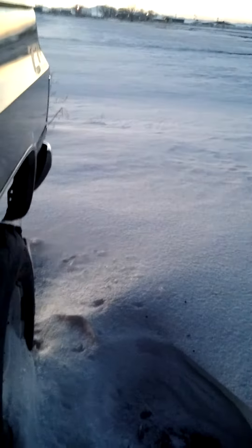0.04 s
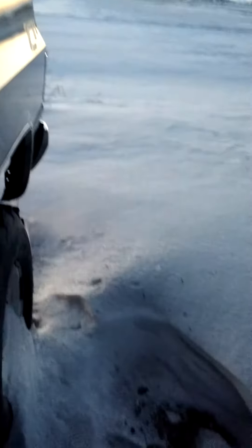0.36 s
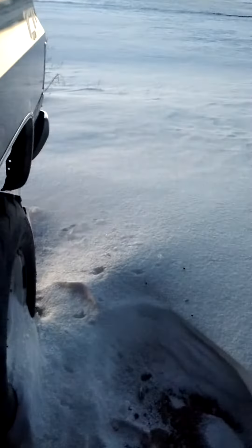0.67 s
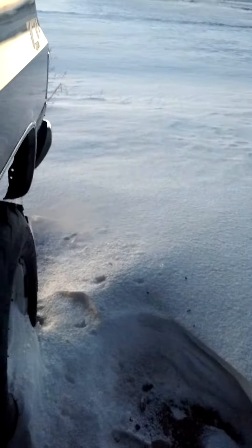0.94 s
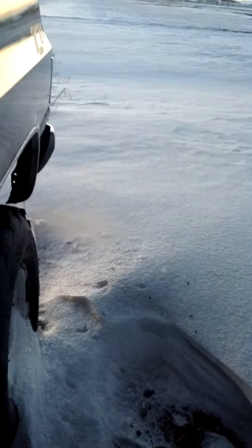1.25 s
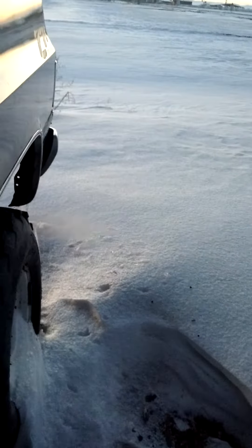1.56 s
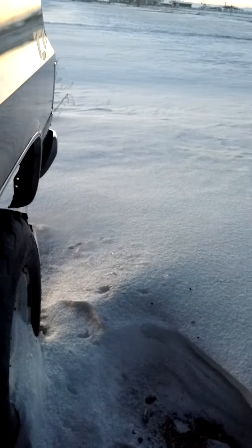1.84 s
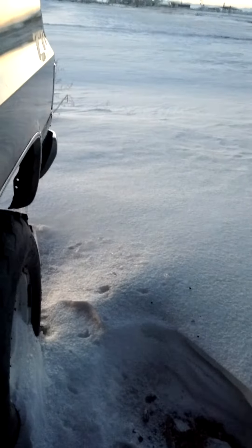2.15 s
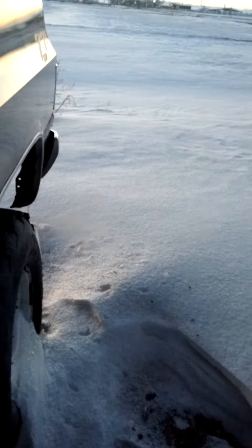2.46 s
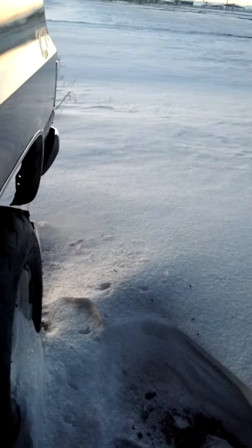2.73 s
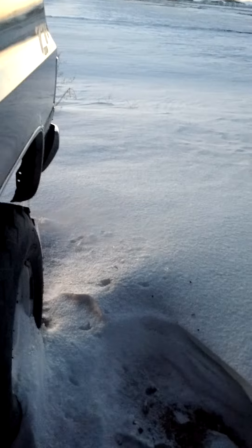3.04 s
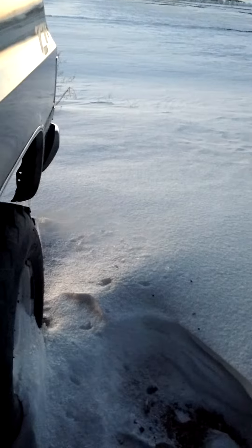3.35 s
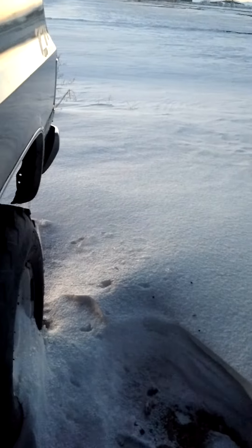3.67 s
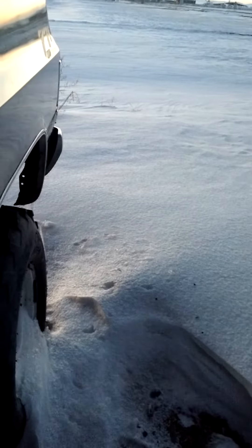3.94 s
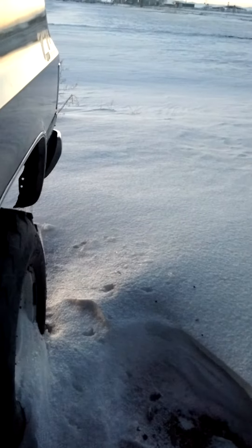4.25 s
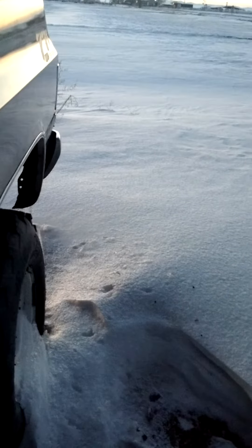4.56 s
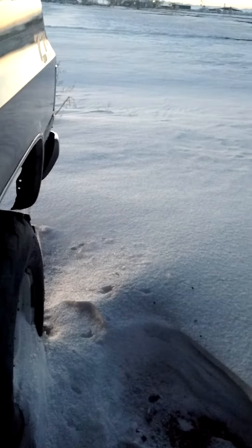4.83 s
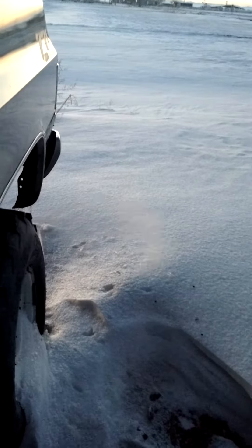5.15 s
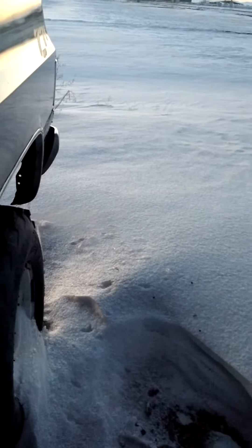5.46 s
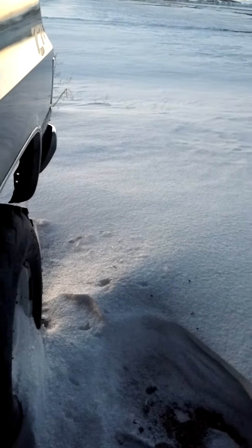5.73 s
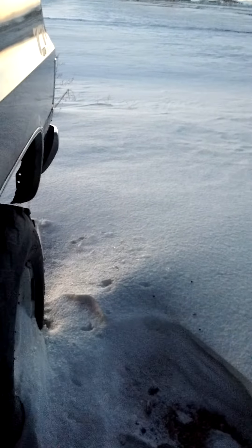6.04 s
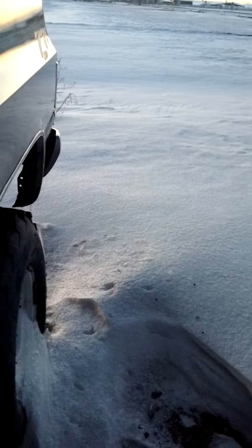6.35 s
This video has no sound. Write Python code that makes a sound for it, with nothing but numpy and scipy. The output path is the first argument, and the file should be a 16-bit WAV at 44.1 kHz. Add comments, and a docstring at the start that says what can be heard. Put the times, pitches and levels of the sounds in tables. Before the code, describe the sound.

A cold truck engine idles close to the tailpipe, loping and sputtering with wet puffs, then sags to a slower, stumbling beat.

```python
"""A cold truck engine lopes at fast idle, then sags to a slower, stumbling idle.
Uneven firings thump through muffler and tailpipe; late-burning charges burble, afterfires knock.
The gas stream rings the pipe's upper modes and spits condensation in wet puffs of hiss.
Heard at a phone's two microphone ports beside the pipe, in an open snowy field with no echo."""
import sys
import numpy as np
from scipy import signal
from scipy.fft import rfft, irfft, next_fast_len
from scipy.io import wavfile

SR = 44100
rng = np.random.default_rng(int(sys.argv[2]) if len(sys.argv) > 2 else 0)


def unload_audio(sound):
    """Save the sound as a 16-bit wav file, at the path given as the first command line argument."""
    columns = np.transpose(np.atleast_2d(sound))
    # keep every value between -1 and 1, then stretch to whole-number steps
    steps = np.round(np.clip(columns, -1, 1) * 32767)
    wavfile.write(sys.argv[1], SR, steps.astype(np.int16))


N = 291060
TIME_S = np.arange(N) / SR
FFT_SIZE = next_fast_len(N + SR // 2, True)
FREQ_HZ = np.maximum(np.arange(FFT_SIZE // 2 + 1) * SR / FFT_SIZE, 1)
FAST_FIRING_HZ, SLOW_FIRING_HZ = 53.37, 42.84
LOPE_START_S, SAG_S = 0.2795, 3.74

# Table levels are relative; each layer adds its own gain.
# one round of the lope, twice through eight cylinders: level_db
LOPE = [-19, -21.5, -16.5, -24.5, -18.5, -24, -20, -20, -19, -25, -19, -17, -22, -27.5, -27, -25.5]
# firing strength as the slow idle falters and recovers: time_s, level_db
STUMBLE = [(3.74, -26), (3.83, -38), (3.88, -34), (3.93, -33), (4.16, -36), (4.72, -24.5), (4.8, -41),
           (4.84, -26), (4.96, -42), (5.01, -26.5), (5.55, -34.5), (5.81, -36), (5.84, -30), (6.55, -32.5)]
# firings that anchor the beat, most burning extra hard: time_s, level_db
THUMPS = [(0.157, -12), (0.439, -17), (0.472, -13.5), (0.895, -16), (1.029, -12.5), (1.084, -15.5),
          (1.217, -18.5), (1.327, -14.5), (1.513, -15.5), (1.623, -17), (1.816, -14.5), (1.929, -13),
          (1.966, -15), (2.394, -15.5), (2.418, -17), (2.527, -15.5), (2.564, -16.5), (2.847, -13),
          (2.994, -17.5), (3.186, -14.5), (3.559, -16), (3.583, -15), (3.809, -15), (3.947, -13),
          (4.501, -13.5), (4.645, -15), (4.699, -13), (4.72, -13), (5.108, -18.5), (5.185, -13.5),
          (5.209, -33), (5.342, -20), (5.394, -18.5), (5.447, -12), (5.465, -17), (5.557, -14), (5.6, -17),
          (5.856, -15), (5.906, -20.5), (5.954, -20), (5.971, -14), (5.998, -19), (6.237, -17.5),
          (6.285, -22), (6.339, -15.5), (6.378, -16), (6.401, -17.5), (6.56, -16)]
# tailpipe ring and muffler boom over time: time_s, ring_db, boom_db
EXHAUST_LEVELS = [(0, 3, 6), (3.5, 4.5, 6), (4.0, 0, 5), (4.6, -6, 4.5), (5.3, -1, 7.5), (6.6, -2, 10)]
# flow through the pipe: time_s, stream_db, steady_hiss_db
FLOW = [(0, -39, -50), (.66, -40, -51.5), (2.2, -41.5, -53.5), (2.8, -39.5, -47.5), (4.03, -39, -54),
        (4.23, -53.5, -57.5), (4.52, -38.5, -48.5), (4.87, -43, -58.5), (5.15, -38, -49), (5.5, -40, -47.5),
        (5.68, -40.5, -57), (6.6, -36.5, -51)]
# late-burning charges: time_s, level_db, pitch_hz
BURBLES = [(0.197, -25, 683), (0.442, -26, 404), (0.487, -25.5, 700), (1.026, -29, 513), (1.08, -26.5, 687),
           (1.309, -28, 403), (1.604, -29, 405), (1.686, -34, 655.6), (1.997, -24, 515), (2.526, -33, 415),
           (2.581, -27.5, 660), (2.887, -28, 660), (3.201, -26, 638), (3.487, -23, 638),
           (3.685, -23.5, 490), (4.389, -35, 507), (4.489, -23, 434), (4.556, -23, 754), (4.585, -28, 540),
           (4.812, -29.5, 658), (5.048, -27, 640), (5.46, -23.5, 550), (5.573, -30, 407),
           (5.836, -24.5, 670), (5.857, -23, 550)]
# afterfires in the pipe: start_s, level_db
KNOCKS = [(0.3256, -22), (0.6112, -26), (1.8172, -38), (2.525, -25), (3.594, -23), (3.952, -30.5),
          (4.6977, -38), (5.186, -28), (5.459, -30), (5.572, -32)]
# wet gas spat from the mouth: time_s, level_db
PUFFS = [(0.101, -41.5), (0.158, -43), (0.212, -41.5), (0.308, -46), (0.4, -35), (0.452, -42.5),
         (0.502, -44), (0.592, -44), (0.687, -44), (0.795, -43), (0.892, -62), (0.955, -43), (0.99, -36.5),
         (1.042, -41.5), (1.252, -44), (1.288, -40), (1.341, -42), (1.394, -45.5), (1.49, -45.5),
         (1.548, -46), (1.584, -40), (1.693, -45.5), (1.792, -46.5), (1.889, -39), (1.943, -40.5),
         (2.089, -45.5), (2.146, -42.5), (2.182, -39.5), (2.293, -42.5), (2.395, -46), (2.488, -38),
         (2.543, -40), (2.688, -45), (2.751, -43), (2.79, -38.5), (2.849, -42), (2.896, -43), (2.995, -44),
         (3.09, -37), (3.199, -40), (3.294, -46), (3.394, -36.5), (3.503, -39), (3.559, -36.5),
         (3.708, -38.5), (3.923, -42.5), (4.088, -42), (4.387, -32.5), (4.468, -42), (4.496, -35),
         (4.532, -42), (4.557, -35.5), (4.583, -28.5), (4.643, -31), (4.672, -36.5), (4.698, -47),
         (4.721, -40.5), (4.809, -38.5), (4.892, -39), (5.045, -34.5), (5.106, -36.5), (5.135, -48),
         (5.184, -36.5), (5.267, -38), (5.339, -38.5), (5.395, -40), (5.463, -39), (5.51, -39.5),
         (5.724, -44), (5.854, -42), (5.905, -37), (5.974, -42.5), (6.047, -37.5), (6.12, -46),
         (6.233, -36), (6.285, -39.5), (6.354, -40), (6.433, -34), (6.509, -40.5), (6.559, -43.5)]

# one firing leaving the tailpipe: freq_hz, gain_db
TAILPIPE_SPECTRUM = [(6, -35.5), (22, -14), (40, -24), (70, 4.5), (92, -1), (108, 5), (133, 5), (152, -4.5),
                     (195, -15.5), (240, -22.5), (300, -35), (500, -25), (2500, -103)]
# steepened pressure wave: freq_hz, gain_db
POP_SPECTRUM = [(40, -7), (130, 4), (210, -22), (300, 3.5), (650, 1.5), (1100, 1), (1700, -16.5),
                (4000, -53)]
# eddies shed at the mouth: freq_hz, gain_db
EDDY_SPECTRUM = [(8, 0), (30, 13), (50, 7.5), (190, 5.5), (400, -36)]
# turbulence in the pipe: freq_hz, gain_db
TURBULENCE_SPECTRUM = [(100, -18), (230, 8.5), (300, -0.5), (500, 0.5), (610, -6.5), (680, -3), (880, -11),
                       (1120, -5.5), (1260, -10), (1450, -9), (2000, -10), (2700, -42.5), (5000, -81)]
# rasp of a burble: freq_hz, gain_db
BURBLE_SPECTRUM = [(30, -16), (200, -26.5), (345, 0.5), (410, 2.5), (490, -0.5), (590, -1), (680, -2.5),
                   (880, -8), (1120, -11), (1600, -20), (4000, -30)]
# hiss at the mouth: freq_hz, gain_db
HISS_SPECTRUM = [(600, 16), (2000, 2.5), (2700, 1.5), (3300, 10.5), (4300, 8), (5350, 2.5), (6100, 4.5),
                 (7100, -1.5), (8200, -2), (9100, -1), (10400, 2.5), (13000, -9), (15500, -25)]

# low pipe modes: pitch_hz, width_hz, gain_db
THROAT_MODES = [(366, 14, -9), (409, 24, 9.5), (520, 15, 9.5), (662.3, 32, 8), (786, 27, -7)]
# narrow modes at the onset of the pipe's first cross-wave: pitch_hz, width_hz, gain_db
CROSS_MODES = [(1630, 22, 6), (1850.4, 40, 5), (1871, 19, 3), (1940, 65, 2.5), (1966, 28, 2.5),
               (2046, 20, 11), (2087, 26, 14.5), (2178, 51, 8.5), (2268, 23, 3.5), (2343, 17, -23),
               (2350, 48, 6)]
# higher cross-modes that colour the hiss: pitch_hz, width_hz, gain_db
MOUTH_MODES = [(3970, 36, -5), (6150, 52, 8), (7550, 61, -9), (9900, 240, 7)]
# water squirting off the rim: centre_hz, width_hz, gain_db
SQUIRT_BANDS = [(4370, 1100, -7.5), (6060, 1800, 5)]

# left port, shaded by the phone, against the right: freq_hz, gain_db
LEFT_GAIN = [(20, 0), (45, -14.5), (70, -16.5), (100, -4), (135, -5.5), (165, -10.5), (340, -2),
             (500, -8.5), (800, 1), (1150, 0), (2150, -5), (3200, 1.5), (6000, -4), (12000, -9.5)]
# left port's phase against the right: freq_hz, lead_rad
LEFT_LEAD = [(45, 0), (110, 1.2551), (1000, 2.5), (2600, 1.28), (4000, 1)]


def undb(db):
    """Decibels to gain."""
    return 10 ** (np.asarray(db) / 20)


def unit_rms(x):
    """Scale to rms 1."""
    return x / np.sqrt(np.mean(x ** 2))


def curves(table, at_s=TIME_S):
    """Table columns, interpolated in time."""
    time_s, *columns = np.transpose(table)
    return [np.interp(at_s, time_s, column) for column in columns]


def over_freq(points):
    """Rows (freq_hz, value), interpolated in log frequency."""
    freq_hz, value = np.transpose(points)
    return np.interp(np.log(FREQ_HZ), np.log(freq_hz), value)


def colour(spectrum):
    """Minimum-phase response from rows (freq_hz, gain_db)."""
    cepstrum = irfft(np.log(undb(over_freq(spectrum))), FFT_SIZE)
    cepstrum[1:FFT_SIZE // 2] *= 2
    cepstrum[FFT_SIZE // 2 + 1:] = 0
    return np.exp(rfft(cepstrum))


def resonance(hz, width_hz):
    """Response of one mode, gain 1 at centre."""
    return 1 / (1 + 1j * (FREQ_HZ ** 2 - hz ** 2) / (FREQ_HZ * width_hz))


def mode_bank(modes):
    """Summed response of rows (pitch_hz, width_hz, gain_db)."""
    return sum(undb(db) * resonance(hz, width_hz) for hz, width_hz, db in modes)


def delay(lag_s):
    """Response of a pure delay."""
    return np.exp(-2j * np.pi * FREQ_HZ * lag_s)


def through(x, response):
    """Filter by a frequency response."""
    return irfft(rfft(x, FFT_SIZE) * response, FFT_SIZE)[..., :N]


def excite(pulses, response):
    """Filter pulses; the impulse response is scaled to peak 1."""
    return through(pulses, response / np.abs(irfft(response, FFT_SIZE)).max())


def noise(response, coherence):
    """Coloured noise at both ports, partly shared, rms 1."""
    shared = np.sqrt(coherence) * rng.standard_normal(N)
    separate = np.sqrt(1 - coherence) * rng.standard_normal((2, N))
    return unit_rms(through(shared + separate, response))


def flutter(rate_hz):
    """Random wander within +-2."""
    knots = np.clip(rng.standard_normal(N // 20), -2, 2)
    return np.interp(TIME_S * rate_hz, np.arange(len(knots)), knots)


def impulses(times_s, gains):
    """Impulse train."""
    return np.bincount(np.clip(times_s * SR, 0, N - 1).astype(int), gains, N)


def swells(events, rise_s, fall_s, order=1):
    """Envelope peaking at each row (time_s, level_db); order 1 pointed, order 2 rounded."""
    time_s, level_db = np.transpose(events)
    lag_s = np.arange(-(SR // 8), SR // 8 + 1) / SR
    shape = np.exp(-2 * np.abs(lag_s / np.where(lag_s < 0, rise_s, fall_s)) ** order)
    power = signal.fftconvolve(impulses(time_s, undb(level_db) ** 2), shape, "same")
    return np.sqrt(np.abs(power))


def mic_hiss(level_db=-71):
    """Steady self-noise of the microphones."""
    return noise(resonance(7900, 9000) ** 2, coherence=0) * undb(level_db)


def engine_bay(firings, level_db=-49):
    """The engine throbs under the body and reaches each port by a different path."""
    throb = unit_rms(np.sqrt(swells(firings, rise_s=0.002, fall_s=0.008)))
    return noise(resonance(396, 260) ** 2, coherence=0) * throb * undb(level_db)


def droplets(rate_hz=55, spread_db=4):
    """Envelope of drops torn from the rim: instant onset, fast decay."""
    position, chance = rng.random((N // 100, 2))[:int(rate_hz * N / SR)].T
    level_db = spread_db * np.minimum(-np.log(chance), 2)
    return unit_rms(swells(np.c_[position * N / SR, level_db], rise_s=1 / SR, fall_s=0.004))


def rim_sizzle(steady_db, gain_db=-8.5, growth=0.62):
    """The water film on the rim sizzles in two bands as flow rises."""
    film = resonance(6550, 570) ** 2 + resonance(4450, 830) ** 2 / 2
    level_db = gain_db + steady_db + growth * (steady_db - steady_db.mean())
    return noise(film, coherence=0.29) * undb(level_db)


def wet_hiss(slow, wet_db=-32, puff_db=-2, tilt_db=2, drop_db=-8, hollow_db=-5):
    """Condensation blows out over a thin steady hiss: in puffs, and a little per slow firing."""
    _, steady_db = curves(FLOW)
    puffs = np.vstack([PUFFS, slow + [0, wet_db]])
    puffing = swells(puffs, rise_s=0.012, fall_s=0.012, order=2) * undb(puff_db)
    blow = np.hypot(puffing, undb(steady_db))
    mouth = colour(HISS_SPECTRUM) * (1 + mode_bank(MOUTH_MODES))
    hiss = noise(mouth, coherence=0.85)
    bright = through(hiss, undb(over_freq([(4500, -3), (6000, 10)])))
    tilt = undb(tilt_db * flutter(23) / 2)
    spray = (hiss - bright) / tilt + bright * tilt
    crackle = noise(mouth * resonance(5930, 9600), coherence=0.14) * droplets() * undb(drop_db)
    sizzle = rim_sizzle(steady_db)
    # puffs blow a hollow pipe note, strong ones most
    hollow = noise(resonance(1103, 96) ** 2, coherence=0.87) * undb(hollow_db)
    hollow *= (blow / blow.max()) ** 0.17
    return (spray + hollow) * blow + sizzle + crackle * np.sqrt(blow * undb(steady_db))


def squirts(gain_db=-7.5, wander_db=3):
    """Each puff tears water off the rim; two noise bands wander in level."""
    burst = swells(PUFFS, rise_s=0.0005, fall_s=0.007) * undb(gain_db)
    bands = sum(noise(resonance(hz, width_hz) ** 2, coherence=0.42) * undb(db + wander_db * flutter(30))
                for hz, width_hz, db in SQUIRT_BANDS)
    return bands * burst


def whumps(gain_db=-6):
    """Strong puffs shove out a slug of gas, which adds low body."""
    shove = swells(PUFFS, rise_s=0.004, fall_s=0.025)
    body = noise(resonance(263, 100) ** 2, coherence=1)
    return body * shove * np.sqrt(shove / shove.max()) * undb(gain_db)


def knocks(gain_db=-1.5):
    """Afterfire in the pipe: one steep, dry pressure spike each."""
    start_s, level_db = np.transpose(KNOCKS)
    rolloff = undb(over_freq([(1400, 0), (3000, -30)]))
    spike = resonance(520, 900) * resonance(1300, 1500) * rolloff
    return excite(impulses(start_s, undb(level_db + gain_db)), spike)


def burbles(rasp_db=-10, roughness_db=2, note_db=-9, note_s=0.011, sag_per_s=1.34):
    """Late-burning charges rasp in the pipe; each rings a note that sinks as the gas cools."""
    rasp = noise(colour(BURBLE_SPECTRUM), coherence=1) * undb(roughness_db * flutter(320))
    burst = swells(np.array(BURBLES)[:, :2], rise_s=0.005, fall_s=0.016)
    notes = np.zeros(N)
    for time_s, level_db, pitch_hz in BURBLES:
        near = np.abs(TIME_S - time_s) < 0.06
        lag_s = TIME_S[near] - time_s
        cycles = rng.random() + pitch_hz * lag_s * (1 - sag_per_s * lag_s / 2)
        notes[near] += undb(level_db - 5 * (lag_s / note_s) ** 2) * np.sin(2 * np.pi * cycles)
    return rasp * burst * undb(rasp_db) + notes * undb(note_db)


def gas_stream(firings, churn_db=-39, modes_db=1, pulsing=0.27, churn_follow=0.11, lope_share=0.075):
    """The stream surges with each firing, churns in the pipe and rings its cross-modes."""
    stream_db = curves(FLOW)[0] + lope_share * lope_db(TIME_S)
    pulses = unit_rms(swells(firings, rise_s=0.012, fall_s=0.012))
    surge = unit_rms(1 - pulsing + pulsing * pulses)
    churn = noise(colour(TURBULENCE_SPECTRUM), coherence=0.97)
    churn *= unit_rms(surge * undb(churn_follow * stream_db))
    drive = noise(resonance(1982, 1290) ** 2, coherence=0.93) * surge
    ringing = unit_rms(through(drive, mode_bank(CROSS_MODES)))
    return churn * undb(churn_db) + ringing * undb(stream_db + modes_db)


def eddies(firings, level_db=-33):
    """Each slug of gas sheds eddies that rumble unevenly."""
    shedding = unit_rms(swells(firings, rise_s=0.031, fall_s=0.0022))
    return noise(colour(EDDY_SPECTRUM), coherence=0.54) * shedding * undb(level_db)


def pops(firings, gain_db=-1):
    """The hardest pressure waves steepen in the pipe and exit with a pop."""
    time_s, level_db = firings.T
    steepened = impulses(time_s, undb(level_db) ** 2) * undb(gain_db)
    return -excite(steepened, colour(POP_SPECTRUM))


def throat(firings, gain_db=-17):
    """Each firing rings the pipe's low modes."""
    time_s, level_db = firings.T
    return excite(impulses(time_s, undb(level_db + gain_db)), mode_bank(THROAT_MODES))


def lope_db(at_s, lag_s=0.015, settle_s=0.43, fade_s=0.29):
    """Firing strength about its mean: the lope starts late, settles, evens out before the sag."""
    late_s = lag_s / (1 + (at_s / settle_s) ** 8)
    firing_index = (at_s - late_s - LOPE_START_S) * FAST_FIRING_HZ
    level_db = np.interp(firing_index, np.arange(len(LOPE)), LOPE, period=len(LOPE))
    return (level_db - np.mean(LOPE)) * np.clip((SAG_S - at_s) / fade_s, 0, 1)


def firing_times(start_s, end_s, rate_hz):
    """Ordinary firings, evenly spaced between thumps at about rate_hz."""
    edges_s = [start_s] + [s for s, _ in THUMPS if start_s < s < end_s] + [end_s]
    steps = np.maximum(1, np.round(np.diff(edges_s) * rate_hz)).astype(int)
    gaps = zip(edges_s, edges_s[1:], steps)
    return np.concatenate([np.linspace(from_s, to_s, count + 1)[1:-1] for from_s, to_s, count in gaps])


def slow_firings(gain_db=7.5, scatter_db=5, jitter_s=0.00197):
    """Stumbling idle, rows (time_s, level_db); a burn can be much weaker, never much stronger."""
    time_s = firing_times(SAG_S, N / SR, SLOW_FIRING_HZ)
    burn, timing = rng.standard_normal((N // 500, 2))[:len(time_s)].T
    level_db = curves(STUMBLE, time_s)[0] + gain_db + scatter_db * np.minimum(burn, 1)
    return np.c_[time_s + jitter_s * timing, level_db]


def fast_firings(scatter_db=3, jitter_s=0.00059, limp_s=0.00097, wander_s=0.0011):
    """Loping idle, rows (time_s, level_db); alternate pulses fall early and late, so the beat limps."""
    time_s = firing_times(-1 / FAST_FIRING_HZ, SAG_S, FAST_FIRING_HZ)
    burn, timing = rng.standard_normal((N // 500, 2))[:len(time_s)].T
    level_db = np.mean(LOPE) + lope_db(time_s) + scatter_db * np.minimum(burn, 1)
    limp_sign = np.cos(np.pi * np.round((time_s - LOPE_START_S) * FAST_FIRING_HZ))
    drift_s = wander_s * np.interp(time_s, TIME_S, flutter(14))
    return np.c_[time_s + drift_s + limp_s * limp_sign + jitter_s * timing, level_db]


def exhaust_beat(firings, ring_gain_db=-1, boom_gain_db=-13, lead_s=0.00487):
    """Each firing rings the tailpipe; the suction behind it booms the muffler. Both dip in the lope."""
    time_s, level_db = firings.T
    pulses = impulses(time_s, undb(level_db))
    ring = excite(pulses, colour(TAILPIPE_SPECTRUM) * delay(-lead_s))
    boom = -excite(pulses, resonance(41.4, 10.9) * resonance(46, 99))
    ring_db, boom_db = curves(EXHAUST_LEVELS)
    dip_db = 0.75 * np.minimum(lope_db(TIME_S), 0)
    return ring * undb(ring_gain_db + ring_db + dip_db) + boom * undb(boom_gain_db + boom_db + dip_db / 2)


def scene():
    """Exhaust, shaded and phase-shifted at the left port, over engine murmur and microphone hiss."""
    slow = slow_firings()
    firings = np.vstack([fast_firings(), slow, THUMPS])
    beat = exhaust_beat(firings) + throat(firings) + pops(firings) + eddies(firings)
    sputter = burbles() + knocks() + whumps() + squirts() + wet_hiss(slow)
    left, right = beat + gas_stream(firings) + sputter
    shade = undb(over_freq(LEFT_GAIN)) * np.exp(1j * over_freq(LEFT_LEAD)) * delay(lag_s=0.00027)
    return np.array([through(left, shade), right]) + engine_bay(firings) + mic_hiss()


def record(dry, low_hz=6, top_hz=15400):
    """The phone cuts the deepest rumble and the top."""
    highpass = signal.butter(1, low_hz, "high", fs=SR, output="sos")
    lowpass = signal.ellip(10, 0.2, 80, top_hz, fs=SR, output="sos")
    return signal.sosfilt(lowpass, signal.sosfilt(highpass, dry))


dry = scene()
out = record(dry)
unload_audio(out)
```